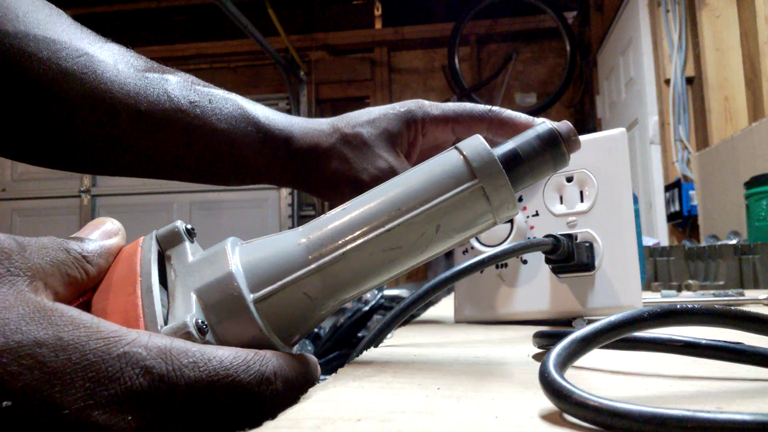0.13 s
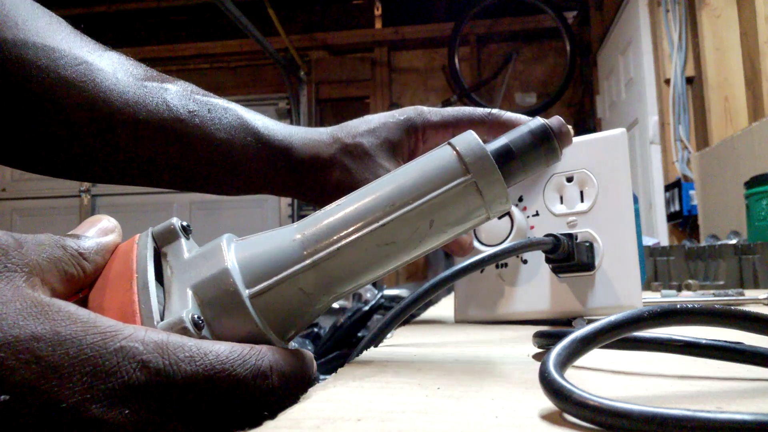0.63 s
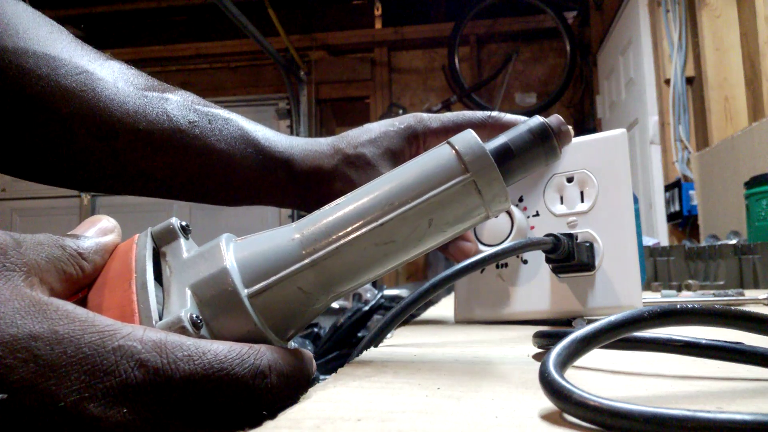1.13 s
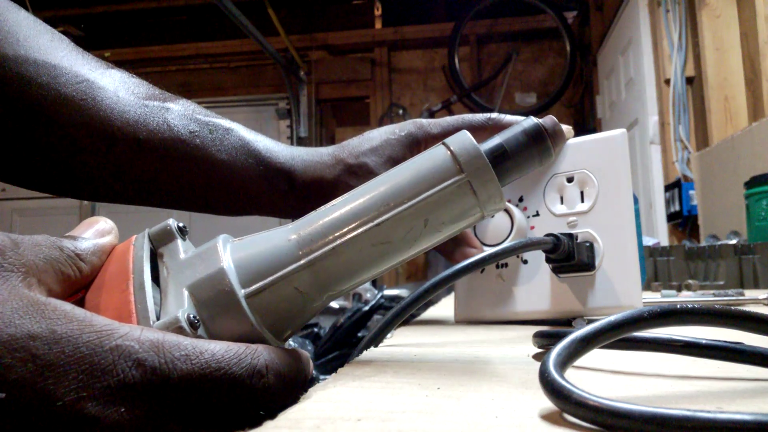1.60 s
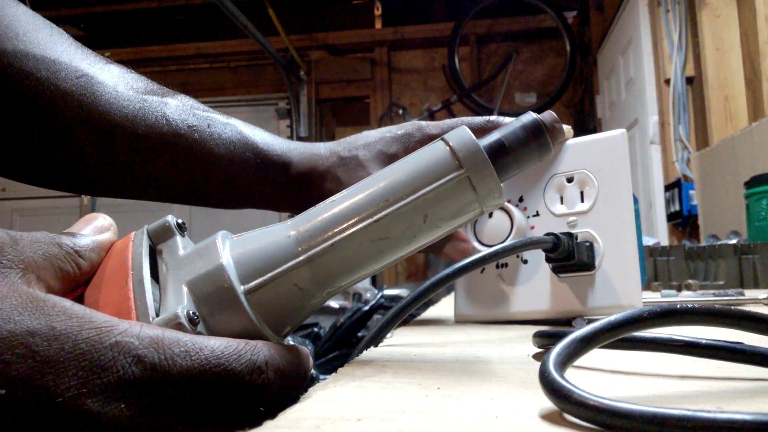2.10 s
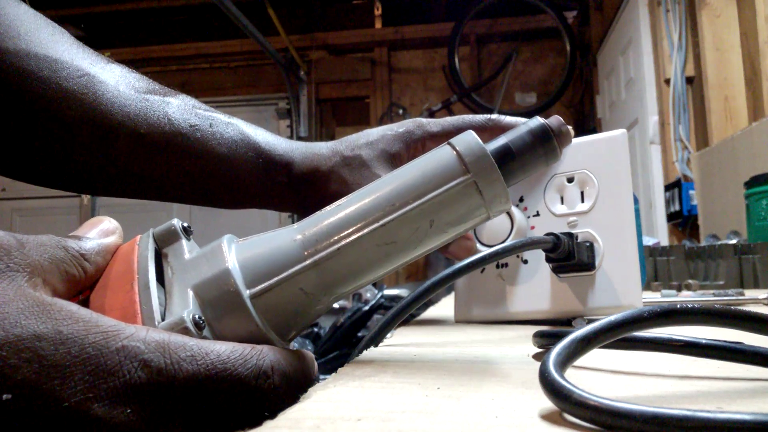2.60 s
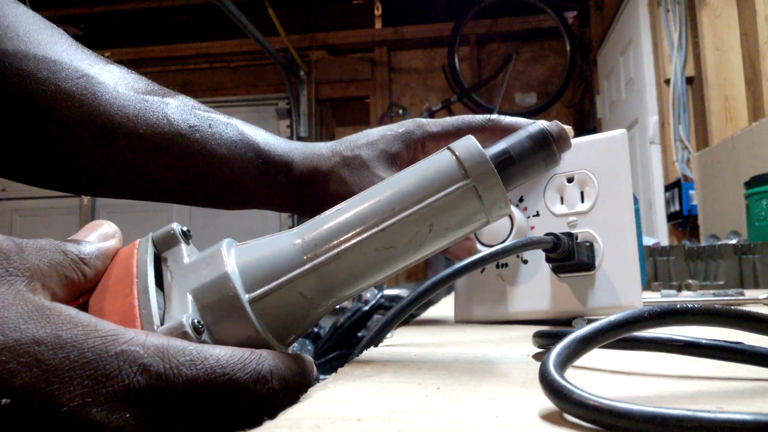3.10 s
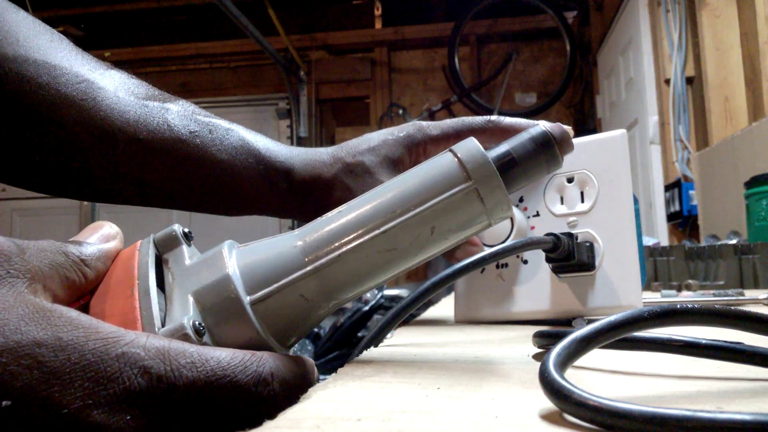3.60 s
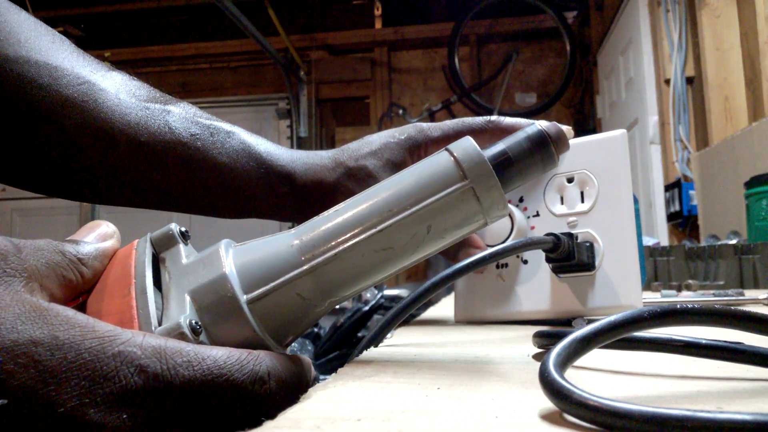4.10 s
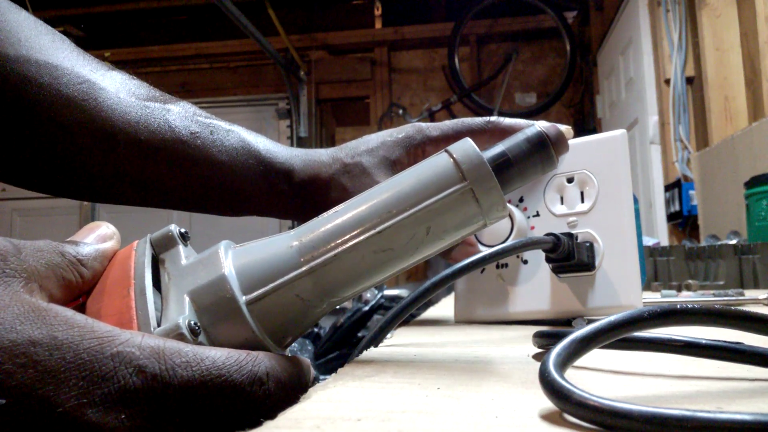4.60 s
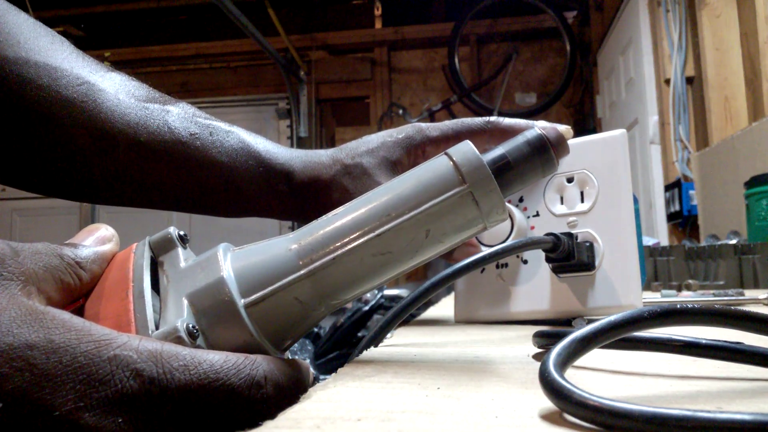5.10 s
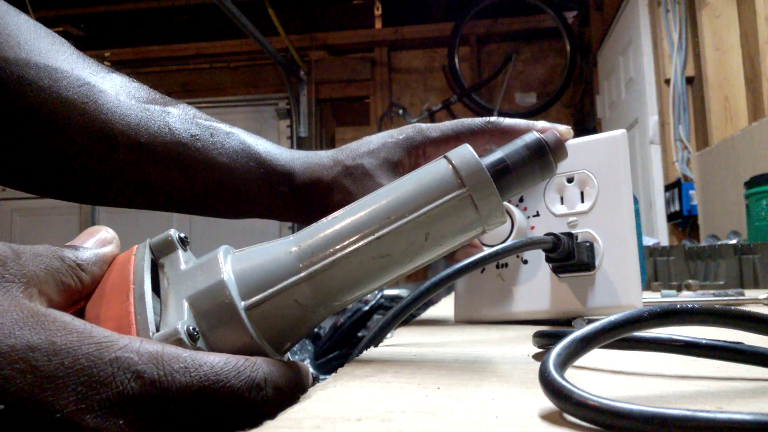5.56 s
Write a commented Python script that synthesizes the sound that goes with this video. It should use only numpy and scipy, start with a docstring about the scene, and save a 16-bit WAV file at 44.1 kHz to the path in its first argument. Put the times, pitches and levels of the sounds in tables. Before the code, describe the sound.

An electric die grinder is already running at full speed, close to the microphone in a garage: a piercing thin whine over loud, bright fan roar and brush hiss. The pitch barely moves at first, then slides smoothly down, faster towards the end, while the roar shrinks strongly. The whine wavers in strength as it descends. Nothing is being ground, and the motor never stops. The room adds only a short, faint reflection.

```python
"""A garage, where a hand-held electric die grinder runs free while its speed dial is turned down.
Sines locked to the gliding shaft make the twelve-per-turn whine and a few other orders. Coloured noise makes
the fan roar, the hiss of brushes and bearings, a narrow fizz and a low rumble; a fixed sine is the windings' hum.
Housing, bench and walls colour the sound by peaks, dips and echoes; one microphone is close by."""
import sys
import numpy as np
from scipy import signal
from scipy.fft import rfft, irfft, next_fast_len
from scipy.io import wavfile
from scipy.ndimage import uniform_filter1d, map_coordinates

SR = 44100
rng = np.random.default_rng(int(sys.argv[2]) if len(sys.argv) > 2 else 0)


def file_out(sig):
    """Save sig as 16-bit WAV at sys.argv[1]."""
    # one column per channel
    cols = np.atleast_2d(sig).T
    # limit, then scale
    lim = np.clip(cols, -1, 1)
    pcm = np.round(lim * 32767).astype(np.int16)
    wavfile.write(sys.argv[1], SR, pcm)


def volts_from_decibels(level):
    """Turn decibel levels (scalar or array-like) into linear amplitude factors."""
    exponent = np.asarray(level, float) / 20
    return 10 ** exponent


N = 251370  # samples, 5.7 s
FULL_HZ = 427  # full shaft speed, turns per second


def unit(x):
    """Normalisation: a signal divided by its root mean square has rms 1."""
    return x / np.sqrt(np.mean(x ** 2) + 1e-20)


def along(points, hz):
    """Logarithmic frequency: (Hz, value) points are joined by lines on a log axis."""
    point_hz, value = np.transpose(points)
    return np.interp(np.log(hz + 1), np.log(point_hz + 1), value)


def wobble(rate):
    """Band-limited fluctuation: random knots, rate of them a second, joined by a smooth curve."""
    knots = rng.standard_normal(int(N * rate / SR) + 4)
    return map_coordinates(knots, [np.arange(N) * rate / SR])


def slowing_db(speed):
    """Power-law scaling: speed in dB re full speed, so that a slope on it is an exponent."""
    return 20 * np.log10(speed / FULL_HZ)


# The shaft slowing as the dial is turned, before smoothing.
# Each row: time in seconds, speed in turns per second.
SHAFT_SPEED = [(0, 427.2), (0.3, 425.87), (0.7, 421.13), (1.1, 413.8), (1.5, 403.3), (1.9, 389.83),
               (2.2, 381.41), (2.6, 371.06), (2.9, 363.47), (3.2, 358.3), (3.5, 350.32), (3.8, 337.66),
               (4.1, 323.3), (4.4, 308.54), (4.8, 292.3), (5.3, 272.67), (5.7, 256.03)]


def shaft_speed():
    """Inertia: a rotor cannot change speed abruptly, so the course is averaged over 0.3 s."""
    seconds, turns_per_second = np.transpose(SHAFT_SPEED)
    course = np.interp(np.arange(N) / SR, seconds, turns_per_second)
    return uniform_filter1d(course, size=13230, mode="nearest")


# Pitches where a pure tone is lifted or cancelled on its way to the microphone.
# Each row: centre in Hz, half width in Hz, gain at the centre in dB.
PATH_GAINS = [(297, 14, -7), (393, 4, -8), (793, 50, -28), (858, 28, 14), (938, 12, 7), (1095, 40, -28),
              (1205, 42, 7), (1343, 90, -28), (1479, 43, -11), (1641, 25, -20), (3188, 7, 6),
              (3231, 20, -10), (3349, 97, -18), (3487, 20, -28), (3578, 96, -14), (3614, 14, 9),
              (3791, 24, 4), (3857, 27, -12), (3964, 47, -15), (4050, 22, -11), (4196, 44, -9),
              (4320, 18, -15), (4435, 28, 13), (4465, 102, -24), (4567, 67, -16), (4665, 22, -28),
              (4733, 33, -16), (4788, 50, -11), (4844, 11, -10), (4895, 75, -20), (4915, 11, 9),
              (4939, 23, -28), (4962, 10, -7), (5016, 22, 4), (5030, 10, -4), (6466, 67, 9),
              (10057, 61, 10), (15149, 67, 15)]


def path_db(hz):
    """Interference: the way from tool to microphone lifts or cancels a pitch as it glides by."""
    total_db = 0
    for centre, half_width, db in PATH_GAINS:
        offset = ((hz - centre) / half_width) ** 2
        total_db = total_db + 10 * np.log10((offset + volts_from_decibels(2 * db)) / (offset + 1))
    return total_db


def tone(turns, order, db, flutter_db):
    """Phase locking: a shaft order repeats a whole number of times per turn; its level trembles."""
    level = np.sqrt(2) * volts_from_decibels(db + flutter_db * wobble(30))
    return level * np.sin(2 * np.pi * (order * turns + rng.random()))


# The shaft tones, as multiples of the speed: cycles per turn.
ORDERS = (1, 3, 4, 12, 24, 36)
# How each order fares with speed, one row per multiple, before the path gain.
# Each row: level at full speed in dB, loss in dB per dB of speed, flutter scale in dB.
ORDER_LEVELS = [(-35.3, 1.6, .4), (-38.5, 5, .4), (-36.5, 3.3, .4), (-15.4, 4.9, .6), (-61, 3.1, 5.5),
                (-72, 4.6, 5.5)]
# A small resonance met by the seventh order. Its single row: centre in Hz, half width in Hz.
SMALL_RESONANCE = (1900, 100)


def rotor(speed):
    """Order excitation: whine, overtones and low unbalance tones follow the shaft and swell along the path."""
    turns = np.cumsum(speed) / SR
    sound = np.zeros(N)
    for order, (full_db, loss, flutter_db) in zip(ORDERS, ORDER_LEVELS):
        db = full_db + loss * slowing_db(speed) + path_db(order * speed)
        sound += tone(turns, order, db, flutter_db)
    # the seventh order sings briefly as it crosses the resonance
    centre, half_width = SMALL_RESONANCE
    crossing_db = -46 - 6 * ((7 * speed - centre) / half_width) ** 2
    return sound + tone(turns, order=7, db=crossing_db, flutter_db=2.0)


# Peaks and dips from housing, bench and hands.
# Each row: centre in Hz, full width at half the dB in Hz, gain in dB.
BODY_PEAKS = [(191, 40, -3.5), (222, 24, 2.5), (336, 59, 3), (496, 25, -6), (542, 30, 3), (747, 43, -6.5),
              (884, 220, 2), (1103, 59, -7.5), (1191, 146, 5.5), (1580, 42, 2.5), (2415, 107, -7),
              (2953, 330, -3), (3397, 390, 5.5), (3790, 290, 7), (3970, 110, -2.5), (4330, 260, 5.5),
              (4925, 170, -4.5), (5120, 300, 4), (5470, 270, 1), (6660, 440, -3.5), (7840, 500, -3),
              (8492, 826, 0), (9020, 260, 4.5), (9300, 273, -3.5), (9960, 420, -5), (11605, 1000, 1.5),
              (13400, 1100, -4), (15320, 2202, 1)]


def rush(spectrum, patchy_db):
    """Source and filter: faintly patchy noise takes its source's spectrum and the body's, at rms 1."""
    z = signal.stft(rng.standard_normal(N), nperseg=512)[2]
    patches = uniform_filter1d(rng.standard_normal(z.shape), 6, 0)  # across frequency
    patches = unit(uniform_filter1d(patches, 14, 1))  # across time
    air = signal.istft(z * volts_from_decibels(patchy_db * patches), nperseg=512)[1][:N]
    m = next_fast_len(N + 8192)
    hz = np.fft.rfftfreq(m, 1 / SR)
    body_db = sum(db * .5 ** ((2 * (hz - c) / w) ** 2) for c, w, db in BODY_PEAKS)
    return unit(irfft(rfft(air, m) * volts_from_decibels(along(spectrum, hz) + body_db), m)[:N])


# Cooling fan roar before the body. Each row: frequency in Hz, relative density in dB per Hz.
FAN_SPECTRUM = [(20, -12), (60, -14), (180, -13), (300, -10.5), (600, -4), (1200, -2), (2400, -4.5),
                (3600, -3.5), (5000, -1.5), (6200, -6.5), (7000, -12), (9000, -17), (12000, -19.5),
                (16000, -29.5)]
# Two parts of the roar, the second falling far more steeply.
# Each row: level at full speed in dB, loss in dB per dB of speed.
FAN_LEVELS = [(-19.5, 4), (-17, 11)]


def fan(speed):
    """Turbulence: broadband roar falls steeply with speed; the powers of its two parts add."""
    parts = [volts_from_decibels(db + loss * slowing_db(speed)) for db, loss in FAN_LEVELS]
    level = np.hypot(*parts) * volts_from_decibels(0.28 * wobble(3.38))
    return level * rush(FAN_SPECTRUM, patchy_db=0.52)


# Brush and bearing hiss before the body. Each row: frequency in Hz, relative density in dB per Hz.
BRUSH_SPECTRUM = [(20, -11), (150, -9.5), (400, -1.5), (1200, -2), (2600, 1), (3600, -6.5), (6000, -12),
                  (9100, -27), (16000, -34)]


def brushes(speed):
    """Friction: rubbing brushes and bearings hiss, falling more gently with speed than the fan."""
    return volts_from_decibels(-25.5 + 1.86 * slowing_db(speed)) * rush(BRUSH_SPECTRUM, patchy_db=0.3)


# A narrow high fizz before the body. Each row: frequency in Hz, relative density in dB per Hz.
FIZZ_SPECTRUM = [(7000, -38), (8050, -3), (8450, -3), (8800, -11), (10000, -40)]


def fizz(speed):
    """Narrow-band noise: a high fizz hardly falls with speed and so outlasts the fan."""
    level_db = -50.5 + 0.38 * slowing_db(speed) + 0.6 * wobble(3)
    return volts_from_decibels(level_db) * rush(FIZZ_SPECTRUM, patchy_db=3.5)


# Decay of the garage. Each row: frequency in Hz, time to fall by 60 dB in seconds.
GARAGE_DECAY = [(200, 0.35), (2000, 0.28), (10000, 0.35)]


def garage(x):
    """Reverberation: early echoes off bench and clutter ripple the treble; a weak tail dies by frequency."""
    hz, t, z = signal.stft(rng.standard_normal(SR // 2), SR, nperseg=256)
    decay = volts_from_decibels(-60 * t / along(GARAGE_DECAY, hz)[:, None])
    tail = signal.istft(z * decay, SR, nperseg=256)[1]
    delay, sign = rng.random((2, 12))  # twelve echoes, 2 to 9 ms late
    early = np.zeros(len(tail))
    early[((.002 + .007 * delay) * SR).astype(int)] = volts_from_decibels(-19 - 4 * delay) * np.sign(sign - .5)
    # small objects return only short wavelengths
    early = signal.sosfilt(signal.butter(2, 4500, "high", fs=SR, output="sos"), early)
    response = early + volts_from_decibels(-15) * tail / np.linalg.norm(tail)
    return signal.fftconvolve(x, response)[:N]


def windings_hum(speed):
    """Magnetic force: the windings hum at four times the mains frequency, fainter as the speed falls."""
    hum_hz = 240
    level_db = -51 + 2.1 * slowing_db(speed) + 1.2 * wobble(3.4)
    return np.sqrt(2) * volts_from_decibels(level_db) * np.sin(2 * np.pi * hum_hz * np.arange(N) / SR)


# Low rumble before the body. Each row: frequency in Hz, relative density in dB per Hz.
RUMBLE_SPECTRUM = [(15, -20), (50, 4), (90, -6), (170, -11), (400, -44)]


def rumble(speed):
    """Amplitude modulation: low noise heaves slowly and sinks a little with speed."""
    level_db = -54.5 + 0.54 * slowing_db(speed) + 1.2 * wobble(2.45)
    return volts_from_decibels(level_db) * rush(RUMBLE_SPECTRUM, patchy_db=1.5)


def scene():
    """Superposition: all sources add, alike on both channels; the tones' swells already hold their echoes."""
    speed = shaft_speed()
    tones = rotor(speed)
    air = fan(speed) + brushes(speed) + fizz(speed)
    mix = tones + air + garage(air) + windings_hum(speed) + rumble(speed)
    return np.tile(mix, (2, 1))


def low_pass(x):
    """Removes everything above the highest recorded frequency."""
    return signal.sosfilt(signal.butter(12, 16090, fs=SR, output="sos"), x)


def record(dry):
    """Saturation and band limiting: the input stage rounds the highest peaks, then the top is cut off."""
    ceiling, top_hz = 0.85, 15750  # ceiling in full scale
    rounded = dry / (1 + np.abs(dry / ceiling) ** 4) ** (1 / 4)
    m = next_fast_len(N + 8192)
    passed = np.fft.rfftfreq(m, 1 / SR) < top_hz
    kept = irfft(rfft(rounded, m) * passed, m)[:, :N]
    return low_pass(kept)


dry = scene()
out = record(dry)
file_out(out)
```